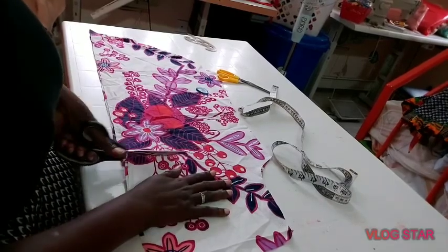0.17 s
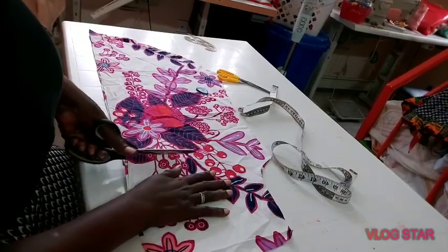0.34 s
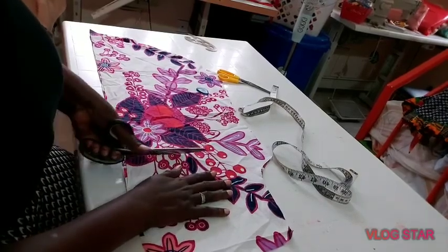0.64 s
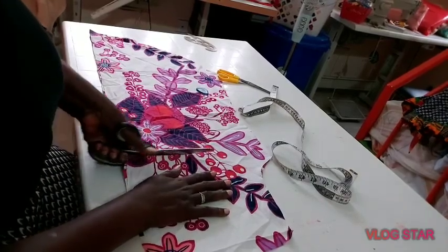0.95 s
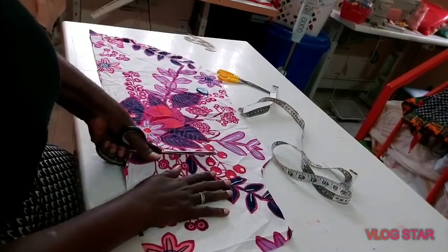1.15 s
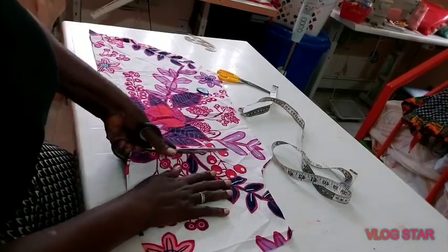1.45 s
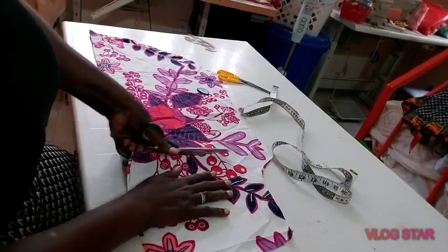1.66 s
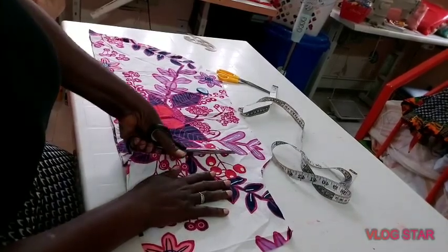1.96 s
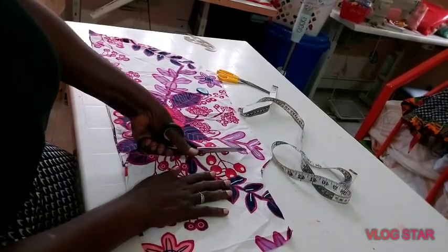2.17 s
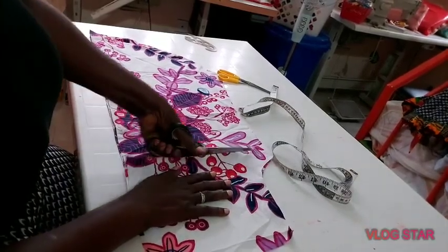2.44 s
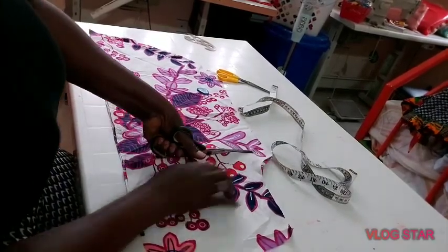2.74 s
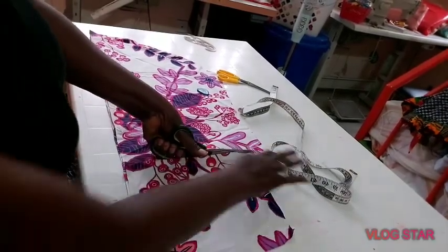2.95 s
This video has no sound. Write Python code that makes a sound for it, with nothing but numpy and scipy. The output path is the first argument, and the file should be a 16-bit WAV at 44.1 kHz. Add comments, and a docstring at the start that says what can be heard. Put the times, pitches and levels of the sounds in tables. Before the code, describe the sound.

Large scissors snip steadily through cloth on a table, blades knocking the board in a workroom

```python
"""In a hard-walled workroom, large tailor's scissors make eight cuts through cloth on a table top.
Trains of tiny clicks, coloured and swelled, give the crunch of snapping threads and the rub of the blades.
Short damped tones and noise bursts give the knocks of the lower blade on the board.
Decaying modes ring the table, scattered reflections answer from the room, and quiet air lies under it all.
At the end a hand brushes over the cloth: a soft sweep of filtered noise."""
import sys
import numpy as np
from scipy import signal
from scipy.fft import rfft, irfft
from scipy.io import wavfile

SR = 44100
rng = np.random.default_rng(int(sys.argv[2]) if len(sys.argv) > 2 else 0)


def inscribe(sig):
    """Save sig as 16-bit PCM at rate SR to the path in sys.argv[1].

    A 1-D sig is mono; a 2-D sig holds one channel per row.
    Samples are clipped to [-1, 1] before scaling.
    """
    pcm = np.round(np.clip(np.atleast_2d(sig).T, -1, 1) * 32767)
    wavfile.write(sys.argv[1], SR, pcm.astype(np.int16))


N = 136710
T, HZ = np.arange(N) / SR, np.fft.rfftfreq(2 * N, 1 / SR)

# Colour of the quiet air: [f/Hz, relative level/dB]
AIR_COLOUR = [(20, -19.5), (60, -8), (130, -2.5), (330, -0.5), (600, -0.5), (900, -4), (1400, -15),
              (2200, -18), (4000, -30), (8000, -34.5), (16000, -42)]
# Decay of the room: [f/Hz, t60/s]
ROOM_DECAY = [(80, 0.5), (210, 0.71), (560, 0.39), (1470, 0.42), (3880, 0.4), (10200, 0.38), (16000, .35)]
# Strength of the room, before its build-up ramp: [f/Hz, level/dB]
ROOM_LEVEL = [(80, 0.5), (150, -1.5), (300, -1), (750, -1.5), (1400, 3), (2500, 1), (5000, 0.5),
              (14000, -2)]
# Likeness of left and right in room, air and hand: [f/Hz, likeness/0-1]
ROOM_ALIKE = [(50, 0.86), (160, 1), (370, 0.88), (650, 0.46), (1000, 0.14), (2000, 0), (16000, 0)]
# Likeness of left and right in the clicks and the steel chatter: [f/Hz, likeness/0-1]
DIRECT_LIKENESS = [(50, 1), (700, .97), (1500, 0.69), (4000, 0.59), (9000, 0.6), (16000, 0.11)]
# Colour difference of the two microphones: [f/Hz, left minus right level/dB]
MIC_BALANCE = [(100, -1.5), (350, 0), (650, 1), (1100, 1), (2300, -2.5), (5000, -3.5), (9000, 0.5),
               (16000, 2.5)]
# Modes of the table top: [f/Hz, level/dB, t60/s]
TABLE_MODES = [(78, -8, 0.25), (113.2, 1, 1), (143, 7.5, 0.53), (191.8, -1.5, 1), (240, -7, 0.9),
               (316.4, 6, 0.25), (390.7, -4, 0.18), (509, 7, 0.1), (632, -18, 0.75), (728, -7.5, 0.71),
               (755.7, -3.5, 0.43), (868, 2, 0.15), (1212, 8, 0.16), (1335, -4, 0.27)]
# Hand sweeping over the cloth: [start t/s, length t/s, level/dB]
HAND_SWEEP = (2.9, .34, -64.5)
# Colour of the brushed cloth: [f/Hz, relative level/dB]
CLOTH_COLOUR = [(30, -30), (150, -14), (500, -9), (950, 10.5), (1400, -1), (2700, 5.5), (3500, -10),
                (4600, -9), (5600, -42), (16000, -37)]
# Blades rubbing open and sliding forward: [start t/s, length t/s, rub level/dB, steel hiss level/dB]
BLADE_OPENINGS = [(-.04, 0.1, -45, -64.5), (0.313, 0.1, -45, -68), (0.668, 0.073, -48.5, -70),
                  (1.002, 0.12, -47, -66), (1.384, 0.15, -49, -70), (1.751, 0.11, -45, -71),
                  (1.9, 0.066, -59.5, -94), (2.147, 0.092, -41, -68.5), (2.541, 0.11, -46.5, -66)]
# Colour of the blade rubbing on the table: [f/Hz, relative level/dB]
RUB_COLOUR = [(25, -29), (70, -5), (130, 3.5), (350, 4), (550, -2.5), (850, 0.5), (1150, -11),
              (1600, -25.5), (2200, -22), (3000, -44), (8000, -61.5)]
# Colour of the parting steel: [f/Hz, relative level/dB]
HISS_COLOUR = [(800, -19), (2200, 10), (4000, 0), (5500, 2.5), (7500, 2), (10000, -5), (16000, -4)]
# Blades catching and knocking on the table, before the board and steel trims:
# [t/s, thud level/dB, thud f/Hz, clack level/dB, clack f/Hz, crack level/dB, steel tick level/dB]
BLADE_KNOCKS = [(0.122, -28, 327, -35, 740, -54, -72), (.156, -14, 347, -17, 668, -31.5, -48),
                (.1905, -8.5, 388, -8, 751, -22, -33.5), (.32, -29.5, 306, -29.5, 767, -48.5, -72),
                (0.391, -35, 400, -40, 650, -72.5, -76), (.472, -31.5, 237, -35.5, 803, -67, -72),
                (.502, -27, 287, -27, 908, -37, -49), (.529, -14.5, 387, -17.5, 833, -35, -38),
                (.56, -16.5, 297, -15.5, 626, -35, -46), (.566, -19.5, 400, -18, 712, -37.5, -46),
                (.682, -30, 273, -33.5, 913, -66, -64), (.832, -36, 314, -43.5, 840, -59, -69),
                (.886, -20, 296.3, -29, 820, -44, -47), (.915, -58, 400, -22, 685, -32, -41),
                (1.2, -29.5, 356, -37.5, 676, -54, -71), (1.233, -19, 404, -31, 627, -42, -51),
                (1.253, -21, 249, -37, 860, -36.5, -43.5), (1.283, -22.5, 327, -20.5, 826, -30, -38.5),
                (1.52, -48, 337, -46, 784, -67, -71), (1.562, -40, 398, -51, 760, -66, -84),
                (1.573, -36.5, 324, -35, 720, -69, -75), (1.596, -23, 406, -22, 743, -40, -57),
                (1.608, -18.5, 428, -18.5, 665, -49, -53), (1.621, -21, 420, -18.5, 685, -33, -57),
                (1.64, -21.5, 310, -19, 806, -31.5, -45), (1.662, -14.5, 361.5, -12.5, 696, -28, -39.5),
                (1.789, -39, 322, -29.5, 803, -58, -72), (1.961, -38, 387, -33, 834, -41, -47.5),
                (1.989, -25, 400, -31, 750, -36.5, -40), (2.012, -34, 398, -21, 581, -42, -59),
                (2.031, -26.5, 207, -23, 898, -50, -42), (2.056, -14.5, 380, -17, 758, -29.5, -41),
                (2.092, -25, 317, -26.5, 800, -35.5, -48), (2.319, -31, 150, -39.5, 550, -54, -68),
                (2.381, -42, 272, -27.5, 865, -30.5, -41), (2.398, -20.5, 151, -27, 942, -34.5, -63),
                (2.417, -20.5, 346, -23, 862, -43, -41.5), (2.443, -29, 302, -24.5, 801, -43, -55),
                (2.727, -31, 322, -37, 790, -59, -66), (2.742, -20, 411, -24, 889, -36.5, -47),
                (2.776, -22, 281, -24, 820, -39, -47.5)]
# Colour of a knock's crack: [f/Hz, relative level/dB]
CRACK_COLOUR = [(400, -16.5), (900, -0.5), (1400, 2.5), (1750, -4.5), (2050, -2.5), (2600, -6), (3200, -12),
                (3900, -12), (5000, -25), (16000, -39.5)]
# Colour of the steel tick: [f/Hz, relative level/dB]
TICK_COLOUR = [(500, -47), (2500, -10), (4000, 9), (5200, 7.5), (8000, 2), (12000, -1), (16000, -8.5)]
# Blades closing through cloth: [start t/s, length t/s, crunch level/dB, table boom level/dB,
# thread fizz level/dB, swell over the stroke/dB, blade rasp level/dB, rasp f/Hz]
SCISSOR_CUTS = [(0.152, 0.054, -35, -33, -62, -11.5, -44, 1390),
                (0.493, 0.083, -32, -37.5, -51.5, 1.5, -51, 3800),
                (0.851, 0.083, -29.5, -35, -48, 3.5, -44.5, 2070),
                (1.22, 0.082, -29, -39, -50, 1.5, -46.5, 2440),
                (1.593, 0.084, -31, -35, -52, 4, -40.5, 2210),
                (1.956, 0.1053, -29, -37, -53, 3.5, -45.5, 2130),
                (2.35, 0.11, -30.5, -36, -54, -4, -41.5, 1960),
                (2.736, 0.046, -31, -35.5, -53.5, 9.5, -56, 2320)]
# Colour of the snapping threads: [f/Hz, relative level/dB]
CRUNCH_COLOUR = [(60, -27), (180, 3.5), (330, 0.5), (550, -1), (880, -0.5), (1100, -7), (1650, -27),
                 (2100, -15), (2500, -22.5), (3000, -30), (4100, -25.5), (5500, -38.5), (16000, -59)]
# Colour of the board under a cut: [f/Hz, relative level/dB]
BOOM_COLOUR = [(20, -37.5), (40, -26.5), (70, -4), (115, 1.5), (200, -2.5), (300, -15), (600, -29),
               (3000, -78)]
# Colour of the fine thread fizz: [f/Hz, relative level/dB]
FIZZ_COLOUR = [(500, -23), (2000, 12.5), (4200, 8.5), (5200, -3.5), (7000, 0.5), (9500, 0), (12000, 6.5),
               (14000, -2.5), (16000, -10)]

AIR_DB = -57.5
ROOM_BUILD_S, REFLECTIONS_PER_S = 0.01, 5000
MIC_LAG_S = 0.00014  # direct sound reaches the left microphone first
EDGE_HZ = 15900  # upper band limit
SNAPS_PER_S, SNAP_SPREAD_DB, RUB_SPREAD_DB = 1400, 4, 3.5
CLUMP_S, CLUMP_DB, SCUFF_DB = 0.0089, 2, 5  # the blades stick and slip, so snaps and scuffs clump
SLIDE_FADE_S = 0.026
THUD_RISE_S, CLACK_RISE_S, CRACK_RISE_S, TICK_RISE_S = 0.0033, 0.0018, 0.0027, 0.0023
THUD_HOLD_S, CLACK_HOLD_S = 0.0038, 0.005  # the blade stays pressed on the board for a moment
SING_DB, SING_T60_S, SING_RISE_S = -15.5, 0.23, 0.027  # the pressed board sings on at the clack's pitch
ECHO_S, ECHO_DB = 0.0052, -2.5  # crack and tick glance off the table
KNOCK_BOARD_DB, KNOCK_STEEL_DB, KNOCK_RING_DB = -4.5, -3, -0.5  # trims: board, steel, table ring
LEAD_S = 0.0048  # the edges touch the cloth just before they bite
BITE_S, FIZZ_BITE_S, RELEASE_S = 0.016, 0.025, 0.0066
RASP_WIDTH_HZ = 536


def amp(db):
    """Decibels to gain."""
    return 10 ** (np.asarray(db) / 20)


def read(points, hz):
    """Reads a table on a log-frequency axis."""
    f, value = np.transpose(points)
    return np.interp(np.log(hz + 1), np.log(f + 1), value)


def evened(x):
    """Scales to unit power."""
    return x / np.sqrt(np.mean(x ** 2))


def colour(x, points):
    """Causal (minimum-phase) filter of the given shape that keeps the power of white noise."""
    gain = amp(read(points, HZ))
    log_gain = np.log(gain / np.sqrt(np.mean(gain ** 2)))
    mirrored = np.r_[log_gain, log_gain[-2:0:-1]]
    response = np.exp(np.conj(signal.hilbert(mirrored)))[:N + 1]
    return irfft(rfft(x, 2 * N) * response)[..., :N]


def resonate(x, hz, width):
    """A steep band around one pitch, at unit power."""
    band = [max(hz - width / 2, 100), hz + width / 2]
    return evened(signal.sosfilt(signal.butter(2, band, "band", fs=SR, output="sos"), x))


def pair(x, alike):
    """Blends two unrelated signals into a left and right of given likeness."""
    a, b = rfft(x, 2 * N)
    c = np.clip(read(alike, HZ), -1, 1)
    return irfft(np.array([a, c * a + np.sqrt(1 - c ** 2) * b]))[:, :N]


def noise():
    """Two unrelated channels of white noise."""
    return rng.standard_normal((2, N))


def gate(start, length, rise, fall):
    """Soft attack, hold and straight release, all within the length."""
    attack = np.sin(np.pi / 2 * np.clip((T - start) / rise, 0, 1)) ** 2
    return attack * np.clip((start + length - T) / fall, 0, 1)


def swell(s, rise, hold=0):
    """A blow that rises, holds and dies away."""
    t = T - s
    held = t - np.clip(t - rise, 0, hold)  # time stands still at the peak
    u = np.clip(held / rise, 0, 60)
    return (u * np.exp(1 - u)) ** 2


def snaps(spread_db):
    """A dense train of tiny clicks of uneven size, scaled to unit power before the stereo blend."""
    size = amp(spread_db * np.minimum(rng.exponential(1, (2, N)), 4))
    sign = rng.choice([-1, 1], (2, N))
    x = size * sign * (rng.random((2, N)) < SNAPS_PER_S / SR)
    return pair(x / x.std(), DIRECT_LIKENESS)


def clumps(depth_db):
    """Quick uneven swings of the blade's grip: slow noise read as a level in dB."""
    sway = irfft(rfft(rng.standard_normal(2 * N)) * np.exp(-(HZ * CLUMP_S) ** 2))[:N]
    return evened(amp(depth_db * np.clip(sway / sway.std(), -2, 2)))


def air():
    """The quiet air of the workroom: steady coloured noise."""
    return amp(AIR_DB) * colour(pair(noise(), ROOM_ALIKE), AIR_COLOUR)


def room(x):
    """Dense reflections build up quickly and die at a rate set by frequency."""
    taps = rng.choice([-1., 1.], (2, N)) * (rng.random((2, N)) < REFLECTIONS_PER_S / SR)
    hz, t, z = signal.stft(pair(taps, ROOM_ALIKE)[:, :SR], SR, nperseg=256)
    fade = amp(-60 * t / read(ROOM_DECAY, hz)[:, None])
    power = np.mean(fade ** 2, 1, keepdims=True) * SR
    fade *= amp(read(ROOM_LEVEL, hz))[:, None] / np.sqrt(power)
    tail = signal.istft(z * fade / taps.std(), SR, nperseg=256)[1][:, :SR]
    tail = tail * np.minimum(T[:SR] / ROOM_BUILD_S, 1)
    # the more left and right agree, the louder their sum, so scale it back
    likeness = max(np.corrcoef(x)[0, 1], 0)
    mono = x.sum(0)[None] / np.sqrt(2 + 2 * likeness)
    return signal.fftconvolve(mono, tail, axes=1)[:, :N]


def table(x):
    """The modes of the table top ring on after whatever shakes it."""
    t, ring = T[:SR], np.zeros(SR)
    for hz, db, t60 in TABLE_MODES:
        unit_peak = 2 * np.log(1000) / (t60 * SR)  # long modes gain no extra level at their pitch
        ring += amp(db - 60 * t / t60) * np.cos(2 * np.pi * hz * t) * unit_peak
    return signal.fftconvolve(x, ring[None], axes=1)[:, :N]


def hand():
    """A hand brushes over the cloth: one soft sweep of filtered noise."""
    start, length, db = HAND_SWEEP
    sweep = gate(start, length, 0.051, 0.11) * pair(noise(), ROOM_ALIKE)
    return amp(db) * colour(sweep, CLOTH_COLOUR)


def opening():
    """The blades part with a faint hiss while the lower one scuffs along the table."""
    rub, hiss = np.zeros((2, N))
    for start, length, rub_db, hiss_db in BLADE_OPENINGS:
        stroke = gate(start, length, SLIDE_FADE_S, SLIDE_FADE_S)
        rub += stroke * amp(rub_db)
        hiss += stroke * amp(hiss_db)
    scuff = rub * clumps(SCUFF_DB) * snaps(RUB_SPREAD_DB)
    return colour(scuff, RUB_COLOUR) + colour(hiss * noise(), HISS_COLOUR)


def glancing(s, rise):
    """A blow of steel and its bounce off the table."""
    return swell(s, rise) + amp(ECHO_DB) * swell(s + ECHO_S, rise)


def knocks():
    """Each knock is a damped thud and clack of the board, with a crack and a tick of steel."""
    board, crack, tick = np.zeros((3, N))
    for s, thud_db, thud_hz, clack_db, clack_hz, crack_db, tick_db in BLADE_KNOCKS:
        turn = 2 * np.pi * (T - s)
        board += amp(thud_db) * swell(s, THUD_RISE_S, THUD_HOLD_S) * np.sin(turn * thud_hz)
        age = np.maximum(T - s, 0)
        sing = np.minimum(age / SING_RISE_S, 1) * amp(SING_DB - 60 * age / SING_T60_S)
        clack = swell(s, CLACK_RISE_S, CLACK_HOLD_S) + sing
        board += amp(clack_db) * clack * np.sin(turn * clack_hz)
        crack += amp(crack_db) * glancing(s, CRACK_RISE_S)
        tick += amp(tick_db) * glancing(s, TICK_RISE_S)
    chatter = pair(noise(), DIRECT_LIKENESS)
    steel = colour(crack * chatter, CRACK_COLOUR) + colour(tick * chatter, TICK_COLOUR)
    return amp(KNOCK_BOARD_DB) * board + amp(KNOCK_STEEL_DB) * steel


def cutting():
    """Threads snap between the blades: a crunch, a boom in the board, a rasp of the edges and a fine fizz."""
    crunch, boom, fizz = np.zeros((3, N))
    rasp = np.zeros((2, N))
    grip, edges = clumps(CLUMP_DB), snaps(SNAP_SPREAD_DB)
    for start, length, crunch_db, boom_db, fizz_db, swell_db, rasp_db, rasp_hz in SCISSOR_CUTS:
        force = amp(swell_db * np.clip((T - start) / length - .5, -1, 1))  # 0 dB at mid-stroke
        stroke = force * gate(start - LEAD_S, length + LEAD_S, BITE_S, RELEASE_S)
        shear = force * gate(start - LEAD_S, length + LEAD_S, FIZZ_BITE_S, RELEASE_S)
        crunch += stroke * amp(crunch_db)
        boom += stroke * amp(boom_db)
        fizz += shear * amp(fizz_db)
        rasp += shear * amp(rasp_db) * resonate(edges, rasp_hz, RASP_WIDTH_HZ)
    threads = grip * snaps(SNAP_SPREAD_DB)
    fibres = 0.5 * threads + 0.75 * grip * noise()
    cloth = colour(threads * crunch, CRUNCH_COLOUR) + colour(fibres * fizz, FIZZ_COLOUR)
    board = colour(snaps(SNAP_SPREAD_DB) * boom, BOOM_COLOUR)
    return cloth + board + grip * rasp


def scene():
    """Scissors and hand at the table, the room's answer and its quiet air."""
    friction = hand() + opening() + cutting()
    blows = knocks()
    near = friction + blows
    direct = near + table(friction + amp(KNOCK_RING_DB) * blows)
    late_right = np.interp(T - MIC_LAG_S, T, direct[1])
    return air() + room(near) + np.array([direct[0], late_right])


def record(dry):
    """The two microphones differ a little in colour; then the band limit."""
    lean = amp(np.outer([.5, -.5], read(MIC_BALANCE, HZ)))
    heard = irfft(rfft(dry, 2 * N) * lean)[:, :N]
    low_pass = signal.firwin(511, EDGE_HZ, window=("kaiser", 9), fs=SR)
    return signal.oaconvolve(heard, low_pass[None], "same")


dry = scene()
out = record(dry)
inscribe(out)
```